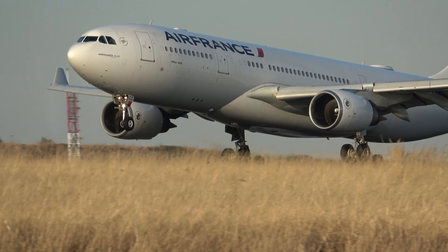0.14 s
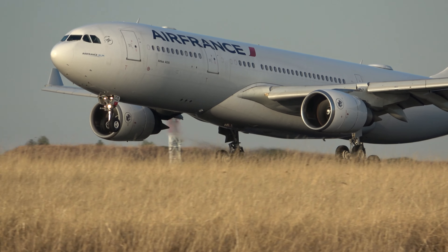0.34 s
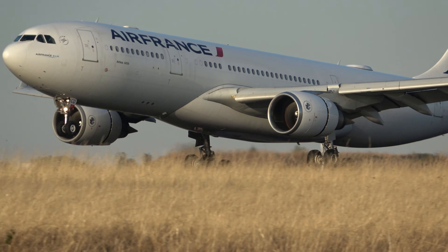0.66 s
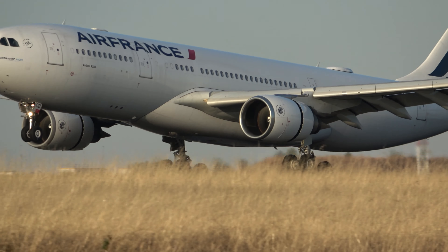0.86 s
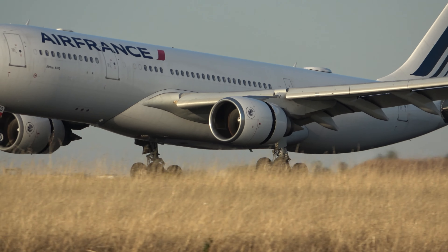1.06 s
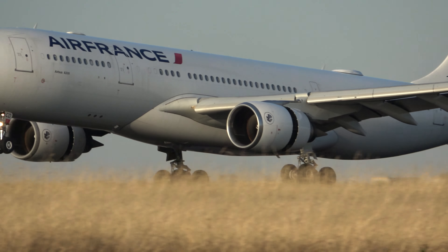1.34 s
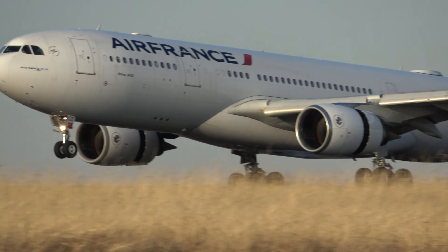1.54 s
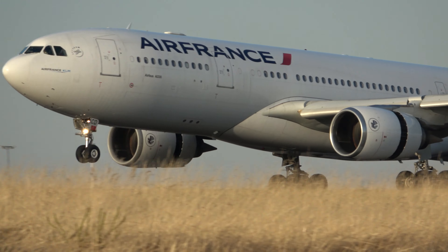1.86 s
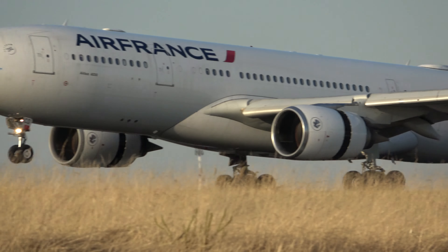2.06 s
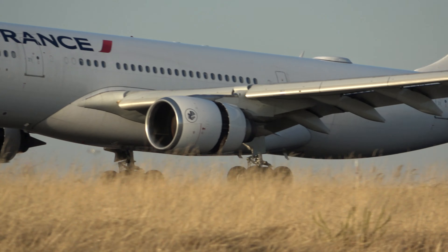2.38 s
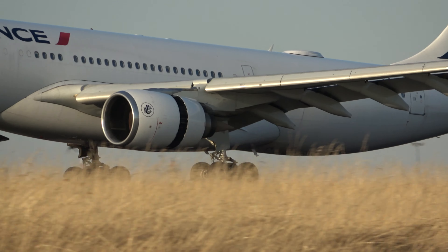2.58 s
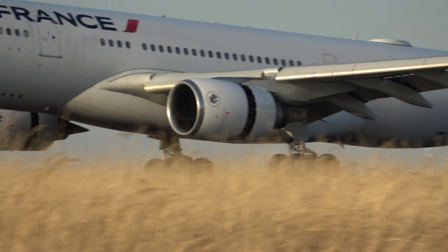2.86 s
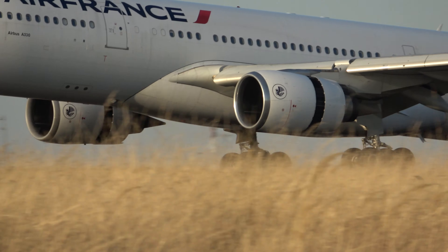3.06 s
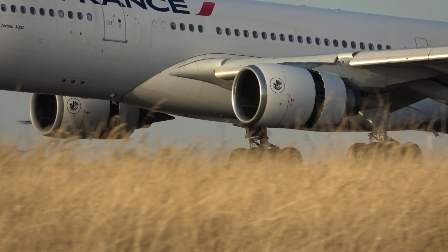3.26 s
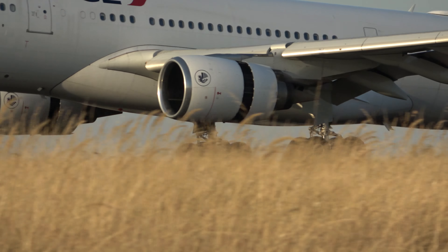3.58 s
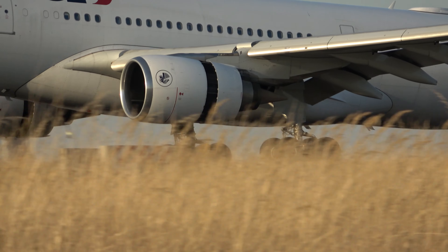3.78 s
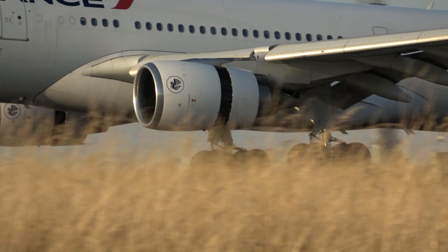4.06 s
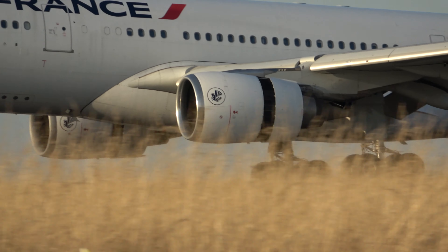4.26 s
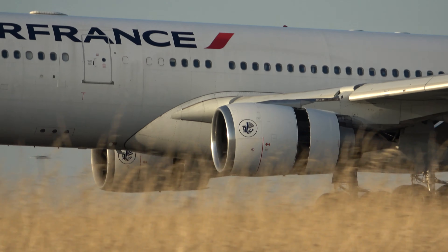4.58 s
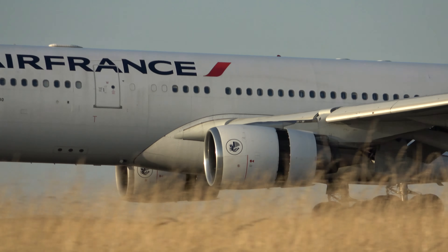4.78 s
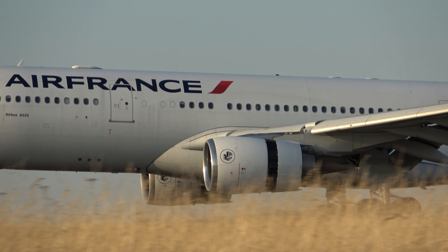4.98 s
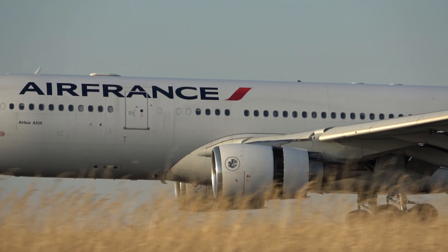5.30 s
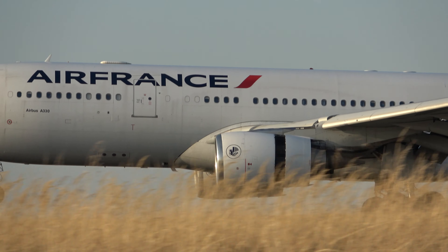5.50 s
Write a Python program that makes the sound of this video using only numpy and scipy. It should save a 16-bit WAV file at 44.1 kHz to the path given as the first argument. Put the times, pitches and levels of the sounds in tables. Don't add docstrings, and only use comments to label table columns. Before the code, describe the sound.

An open grass field beside a runway, heard through one distant, wind-exposed microphone. Throughout, gusts thump and flutter in the deep bass, several per second, with the hardest buffets around 4.4-4.7 s. From 0 s a landed twin-engined airliner idles past: a soft airy rush, a blurred mid-pitched hum from the intakes, and a thin, slightly wavering high whine that glides down, clearest near 1.5 s and sinking until about 3 s. A faint low moan blurs in around 1.7-2.3 s. From 2.8 s reverse thrust opens, and a broad roar swells to a first peak at 3.5 s, burying the whine. Four short hollow howls follow at 3.6-4.15 s as the roar eases. It surges at 4.4 s, dips briefly, then climbs, rougher and brighter, with a faint high squeal at 5.1-5.3 s. Small sharp overload ticks appear from 4.4 s, thickening towards the loudest roar at 5.6 s, where it cuts off.

```python
import sys
import numpy as np
from scipy import signal
from scipy.fft import rfft, irfft
from scipy.io import wavfile
from scipy.ndimage import uniform_filter1d, minimum_filter1d

SR = 44100
rng = np.random.default_rng(int(sys.argv[2]) if len(sys.argv) > 2 else 0)


def volts(x):
    e = np.asarray(x, float) / 20
    return 10 ** e


def dump_mix(stems):
    frames = np.atleast_2d(stems).T
    limited = np.clip(frames, -1, 1)
    pcm = np.round(limited * 32767).astype(np.int16)
    wavfile.write(sys.argv[1], SR, pcm)


N = 248724

# frequency in Hz, level in dB per Hz.
HISS_COLOUR = [(3000, -1), (8000, 2.5), (10000, -1.5), (12000, -2), (16500, -4.5)]
# time in seconds, peak in dB.
OVERLOAD_TICKS = [(4.3876, -43.5), (4.4468, -37), (4.6344, -45), (4.7498, -49.5), (4.811, -53),
                  (4.942, -46.5), (5.2627, -57), (5.3158, -35), (5.347, -38), (5.4026, -43), (5.448, -56.5),
                  (5.475, -35.5), (5.4959, -40), (5.5528, -31), (5.611, -33)]
# middle in seconds, length in seconds, level in dB,
# pitch of the shed eddies in Hz.
WIND_GUSTS = [(0.112, 0.22, -16.5, 40), (0.402, 0.27, -12, 38), (0.576, 0.162, -10.5, 48),
              (0.79, 0.13, -12.5, 45), (0.997, 0.29, -13.5, 38), (1.195, 0.231, -10.5, 27),
              (1.429, .36, -11.5, 25), (1.622, 0.25, -10, 26), (1.818, .17, -9, 29),
              (1.997, 0.1658, -8.5, 25), (2.109, 0.0995, -7.5, 48), (2.349, .17, -9.5, 24),
              (2.547, .28, -11, 14), (2.675, 0.118, -12, 45), (2.97, .18, -9, 57), (3.09, .12, -10.5, 22),
              (3.262, 0.2146, -11.5, 16), (3.494, 0.12, -13.5, 28), (3.698, .22, -11.5, 30),
              (3.977, 0.1674, -12.5, 52), (4.174, .28, -13.5, 25), (4.426, 0.14, -5.5, 21),
              (4.623, .06, -2.5, 51.06), (4.68, 0.18, -10, 43.7), (4.789, 0.18, -8.5, 50),
              (5.003, .22, -11, 40), (5.195, 0.23, -12.5, 43), (5.351, .45, -9.5, 53),
              (5.54, 0.27, -10.5, 58)]
# frequency in Hz, level in dB per Hz.
DEEP_COLOUR = [(4, -28), (8, -10), (28, 1), (36, -3.5), (44, -26.5)]
# frequency in Hz, level in dB per Hz.
BUFFET_COLOUR = [(28, -27.5), (36, -2.5), (52, 1), (72, -6.5), (88, -31)]
# frequency in Hz, level in dB per Hz.
FLUTTER_COLOUR = [(41, -24.5), (70, 5), (135, -9), (200, -22), (260, -46.5), (440, -120)]
INTAKE_HZ = (859.6, 1010)
# start in seconds, end in seconds, pitch in Hz, width in Hz, level in dB.
DUCT_HOWLS = [
    (3.6, 3.7, 480, 2.6, -34),
    (3.73, 3.91, 482, 2.7, -29),
    (3.935, 4.05, 496, 2.6, -28),
    (4.045, 4.15, 485, 3, -25),
    (5.06, 5.22, 4850, 20, -44),
    (5.14, 5.28, 4960, 20, -41),
    (1.697, 2.293, 490, 24, -42),
]
# time in seconds, pitch in Hz.
FAN_PITCH = [
    (0, 3135),
    (.9, 2978),
    (1.45, 2870),
    (2.2, 2742),
    (2.95, 2597),
    (3.5, 2680),
]
BLADE_RATIOS = [1, 1.342, 1.453, 1.775, 2]
# loudest moment in seconds, peak in dB,
# rise in dB per second, fall in dB per second.
BLADE_BEAMS = [(1.45, -44, 4.0, 4.0), (1.78, -58, 7.0, 25.0), (.75, -57.5, 6.0, 10.0),
               (1.45, -63, 14.0, 1.5), (1.88, -76, 25.0, 14.0)]
# time in seconds, thrust as roar level in dB, clearness of the air in dB,
# rumble of the wake in dB.
ENGINE_MOVES = [(0, -37, -3, -4), (.45, -36, -1.5, -3), (1.1, -33, -3.5, 0), (1.75, -37.5, 0.5, -0.5),
                (2.2, -32, -4, -1), (2.75, -35, 4.5, 3.5), (3.05, -29, 0.5, 1.5), (3.3, -26.5, 1, 1),
                (3.48, -23.5, -2, -1.5), (3.72, -26.5, 2, 2.5), (4.08, -29, 4.5, 3.5),
                (4.4, -25.5, 2.5, 3.5), (4.63, -29, 7, 5), (5.0, -24, 2.5, 6), (5.1, -23.5, 5.5, 5.5),
                (5.25, -20, 10, 8), (5.4, -20.5, 2.5, 8), (5.64, -15, 3, 8)]
# frequency in Hz, level in dB per Hz.
JET_COLOUR = [(88, -31.5), (150, -4.5), (347, -6), (600, -5), (810, -2.5), (922, 3.5), (1040, -2),
              (1180, -5), (3450, -12.5), (4090, -20.5), (5400, -28), (6120, -41.5), (7200, -54.5),
              (12000, -84.5)]
# low edge in Hz, high edge in Hz.
ROAR_BANDS = [
    (1250, 3700),
    (170, 650),
    (720, 1150),
    (4200, 6500),
]
# level at mean thrust in dB,
# share of the thrust swing, share of the clearness, share of the rumble.
BAND_FOLLOW = [
    (-30, 0.034, 0.038, 0.99),
    (-27, 0.39, .05, 0.18),
    (-50, 1.0, 1.0, .01),
]

BREEZE_DEEP_DB, BREEZE_UPPER_DB = -22, -20


def rms_one(x):
    return x / np.sqrt(np.mean(x ** 2) + 1e-20)


def in_time(rows):
    s, *columns = np.transpose(rows)
    return [np.interp(np.arange(N) / SR, s, c) for c in columns]


def drift(rate_hz):
    r = np.exp(-80 * np.pi * rate_hz / SR)
    noise = rng.standard_normal(N // 40 + 2002)
    slow = signal.lfilter([1], [1, -2 * r, r * r], noise)[2000:]
    return np.interp(np.arange(N) / 40, np.arange(len(slow)), rms_one(slow))


def coloured(colour):
    log_hz = np.log(np.fft.rfftfreq(N, 1 / SR) + 1)
    hz, db = np.transpose(colour)
    shape_db = np.interp(log_hz, np.log(hz), db, left=-99, right=-99)
    return log_hz, rfft(rng.standard_normal(N)) * volts(shape_db)


def coloured_noise(colour):
    return irfft(coloured(colour)[1], N)


def wobbling_tone(hz, width_hz, steady):
    wander = steady + (1 - steady) * (drift(width_hz) + 1j * drift(width_hz))
    return rms_one(np.real(wander * np.exp(2j * np.pi * np.cumsum(hz) / SR)))


def preamp_hiss(dry):
    bright_db = 10 * np.log10(uniform_filter1d(np.diff(dry, prepend=0) ** 2, size=8000))
    duck_db = -.4 * np.maximum(0, bright_db + 42)
    return volts(-72 + duck_db) * rms_one(coloured_noise(HISS_COLOUR))


def overload_ticks():
    corner_gap_s = 0.00034
    out = np.zeros(N)
    second = rng.uniform(0.33, 0.67, (len(OVERLOAD_TICKS), 2))
    for (s, db), (lag, size) in zip(OVERLOAD_TICKS, second):
        at = round((s + .001) * SR)
        neighbour = at + 1 + round(lag * corner_gap_s * SR)
        out[[at, neighbour]] += volts(db + 17.5) * np.array([1, 0.55 * size])
    return signal.sosfilt(signal.butter(1, [4000, 9000], "band", fs=SR, output="sos"), out)


def gusts():
    rise_share, split_hz, split_octaves = 0.703, 46.5, 0.37
    eddy_share, lock_per_s = 0.66, 1
    s, length, db, hz = np.transpose(WIND_GUSTS)[:, :, None]
    t = np.arange(0, N, 64) / SR
    spread = length / 4 * np.where(t < s, rise_share, 2 - rise_share)
    power = volts(2 * db) * np.exp(-((t - s) / spread) ** 2 / 2)
    high = 1 / (1 + (split_hz / hz) ** (1 / split_octaves))
    deep = np.sqrt(volts(2 * BREEZE_DEEP_DB) + np.sum(power * (1 - high), axis=0))
    upper = np.sqrt(volts(2 * BREEZE_UPPER_DB) + np.sum(power * high, axis=0))
    shortness = (length.mean() / length) ** 1.5
    kick = np.sqrt(volts(2 * BREEZE_UPPER_DB) + np.sum(power * high * shortness, axis=0))
    eddy_hz = np.sum(power * hz, axis=0) / (power.sum(axis=0) + 1e-30)
    tonal = eddy_share + lock_per_s * (length - length.mean())
    share = np.sqrt(np.sum(power * tonal ** 2, axis=0) / (deep ** 2 + upper ** 2))
    return [np.interp(np.arange(N) / SR, t, c) for c in (deep, upper, kick, eddy_hz, share)]


def wind():
    deep, upper, kick, eddy_hz, share = gusts()
    share = np.clip(share, 0, .97)
    deep_thud = deep * rms_one(coloured_noise(DEEP_COLOUR))
    upper_buffet = upper * rms_one(coloured_noise(BUFFET_COLOUR))
    eddy_phase = 2 * np.pi * np.cumsum(eddy_hz) / SR
    eddy = np.sqrt(2) * volts(-0.5 * drift(1.6)) * np.sin(eddy_phase)
    broad = np.sqrt(1 - share ** 2) * (deep_thud + upper_buffet)
    tonal = share * np.hypot(deep, upper) * eddy
    gust_db = 20 * np.log10(kick) - BREEZE_UPPER_DB
    rumble_db = in_time(ENGINE_MOVES)[-1]
    flutter_gain = volts(-25 + 0.34 * gust_db + .9 * rumble_db)
    lumpy = rms_one(coloured_noise(FLUTTER_COLOUR) * volts(2.0 * drift(12.0)))
    return broad + tonal + flutter_gain * lumpy


def intake_hum():
    wander_hz, start_db, fade_db_per_s = 50.16, -35, 1.0
    hums = 0
    for hz in INTAKE_HZ:
        hums = hums + wobbling_tone(hz + wander_hz * drift(2.5), 25.0, steady=0.18)
    return volts(start_db - fade_db_per_s * np.arange(N) / SR) * hums


def duct_howls():
    rise_share = .012
    t, out = np.arange(N) / SR, 0
    for start, end, hz, width_hz, db in DUCT_HOWLS:
        along = np.clip((t - start) / (end - start), 0, 1)
        pitch_hz = hz * (1 + rise_share * (2 * along - 1))
        swell = volts(db) * np.sin(np.pi * along)
        out = out + swell * wobbling_tone(pitch_hz, width_hz, steady=.8)
    return out


def spool_whine():
    far_speed, far_db = .975, -6
    fan_hz, = in_time(FAN_PITCH)
    t = np.arange(N) / SR
    fade = np.clip((FAN_PITCH[-1][0] - t) / 0.34, 0, 1)
    out = 0
    for ratio, (s, peak_db, rise, fall) in zip(BLADE_RATIOS, BLADE_BEAMS):
        db = peak_db - rise * np.maximum(s - t, 0) - fall * np.maximum(t - s, 0)
        near = wobbling_tone(ratio * fan_hz, 16 * ratio, steady=.55)
        far = volts(far_db) * wobbling_tone(far_speed * ratio * fan_hz, 14 * ratio, steady=0)
        out = out + volts(db + 1) * (near + far)
    return fade * out


def jet_roar():
    mean_thrust_db = -30
    shared_db, patchy_db, flicker_db = 0.19, 1.0, 0.86
    air_edge_hz, edge_lift_db = 3140, 1
    log_hz, roar = coloured(JET_COLOUR)
    thrust_db, clear_db, rumble_db = in_time(ENGINE_MOVES)
    swing_db, t = thrust_db - mean_thrust_db, np.arange(N) / SR
    band_levels_db = [thrust_db]
    for db, by_thrust, by_air, by_wake in BAND_FOLLOW:
        band_levels_db.append(db + by_thrust * swing_db + by_air * clear_db + by_wake * rumble_db)
    centres, gains_db = [], []
    for (low, high), db in zip(ROAR_BANDS, band_levels_db):
        inside = (log_hz > np.log(low)) & (log_hz < np.log(high))
        own_rms = np.sqrt(2 * np.sum(np.abs(roar[inside]) ** 2)) / N
        centres.append(np.log(low * high) / 2)
        gains_db.append(db - 20 * np.log10(own_rms))
    order = np.argsort(centres)
    out, together, step = 0, drift(3.0), np.log(2) / 3
    for centre in np.arange(np.log(120), np.log(11000), step):
        place = np.interp(centre, np.array(centres)[order], np.arange(4))
        gain_db = sum(max(0, 1 - abs(place - k)) * gains_db[j] for k, j in enumerate(order))
        gain_db = gain_db + shared_db * together + patchy_db * drift(4.1) + flicker_db * drift(24)
        octaves_above = max(0, centre - np.log(air_edge_hz)) / np.log(2)
        gain_db = gain_db + edge_lift_db * (t - t.mean()) * octaves_above
        band_slice = roar * np.clip(1 - abs(log_hz - centre) / step, 0, 1)
        out = out + volts(gain_db) * irfft(band_slice, N)
    return out


def scene():
    return (wind() + intake_hum() + duct_howls() + spool_whine() + jet_roar())[None]


def low_pass(x):
    return signal.sosfilt(signal.butter(12, 15830, fs=SR, output="sos"), x)


def record(dry):
    ceiling = .95
    over_db = np.minimum(0, 20 * np.log10(ceiling / (np.abs(dry) + 1e-9)))
    gain_db = uniform_filter1d(minimum_filter1d(over_db, size=401), size=200)
    gain_db = uniform_filter1d(gain_db, size=200)
    edges = np.clip(np.minimum(np.arange(N) / 40, (N - np.arange(N)) / 6), 0, 1)
    mix = edges * dry * volts(gain_db) + overload_ticks() + preamp_hiss(dry)
    return low_pass(mix)


dry = scene()
out = record(dry)
dump_mix(out)
```